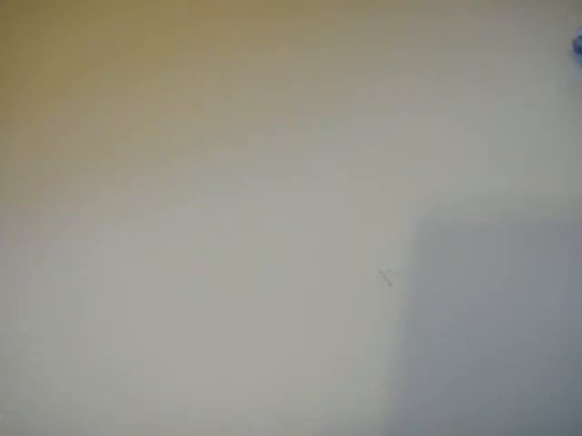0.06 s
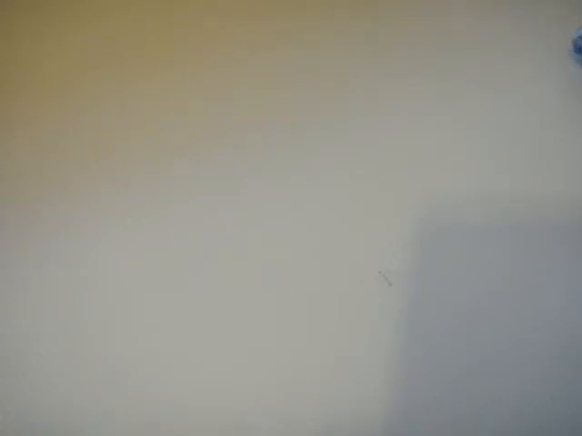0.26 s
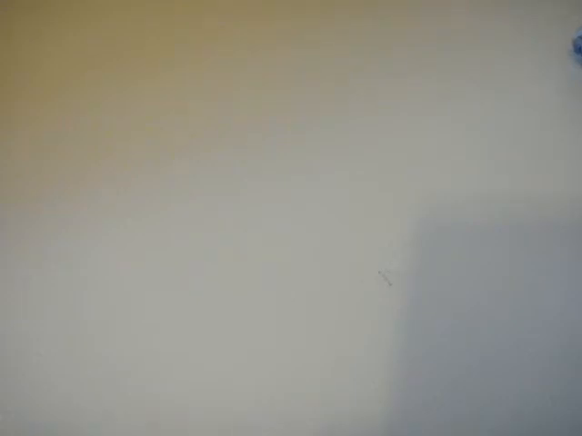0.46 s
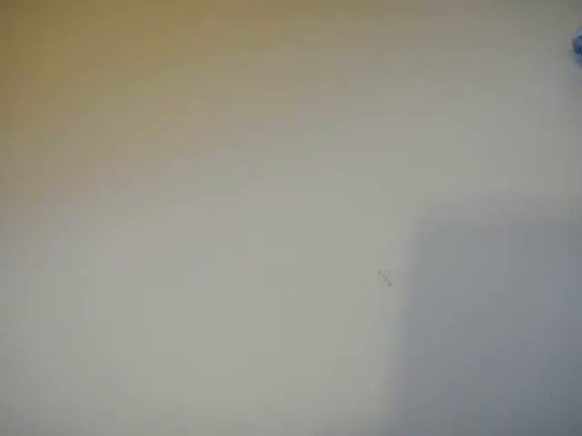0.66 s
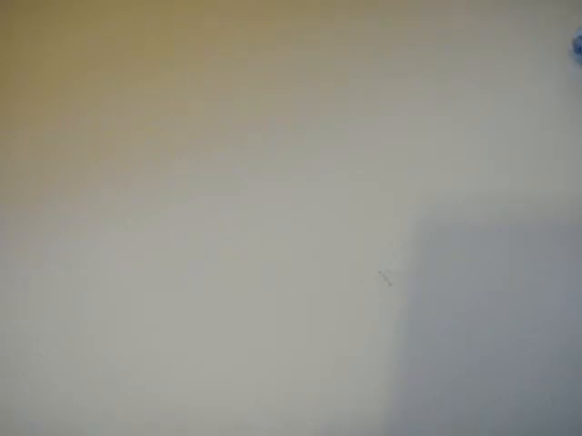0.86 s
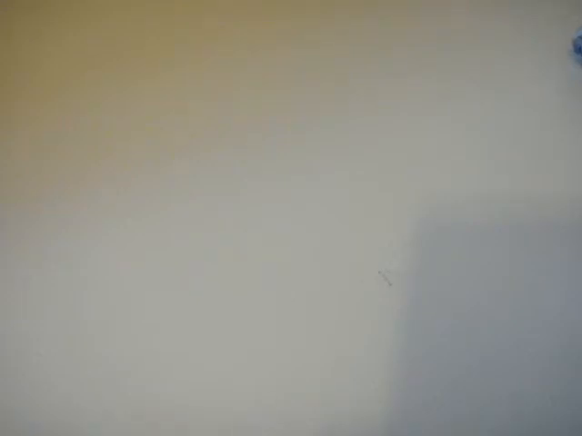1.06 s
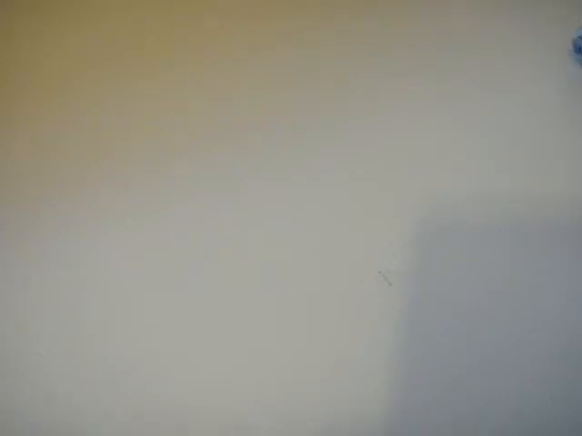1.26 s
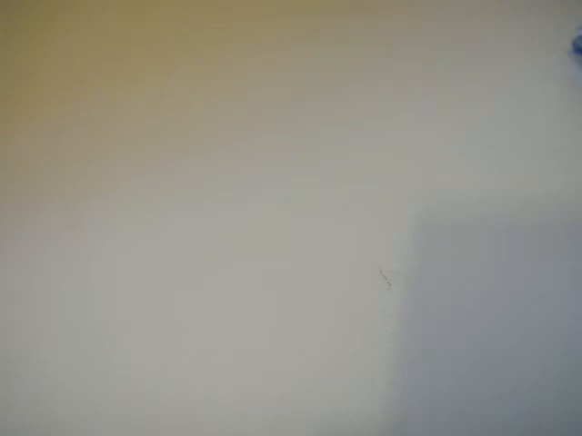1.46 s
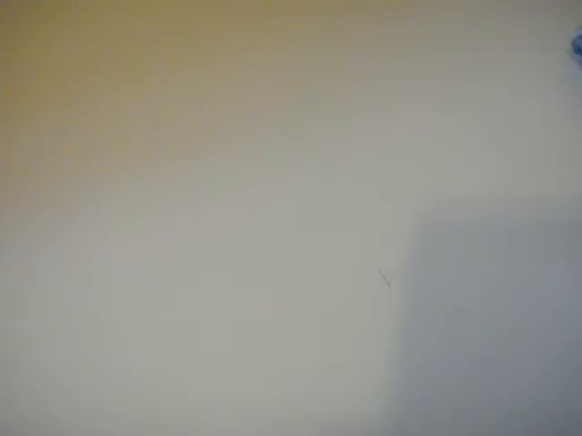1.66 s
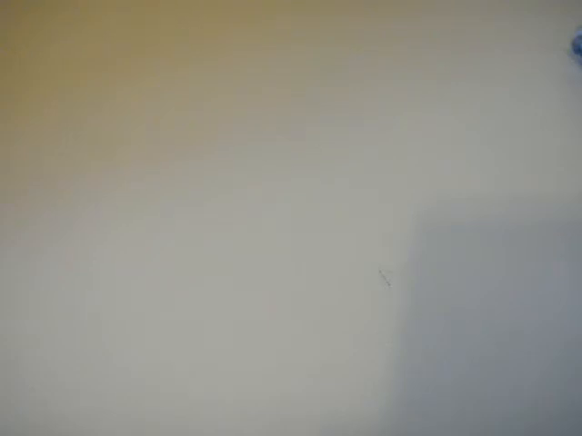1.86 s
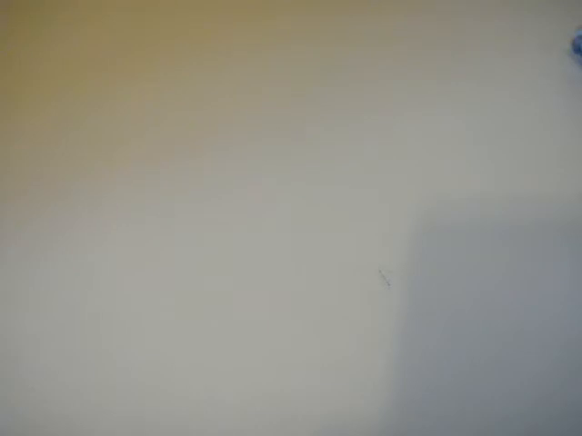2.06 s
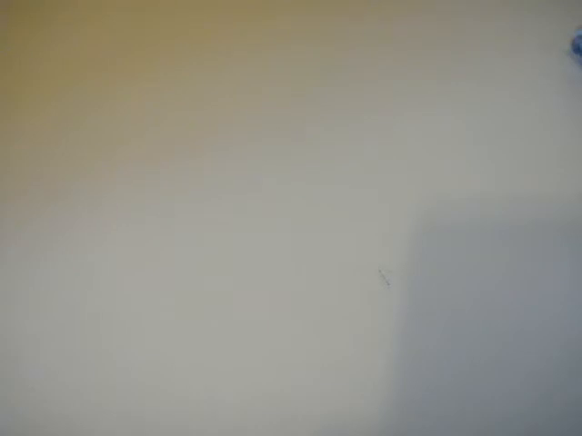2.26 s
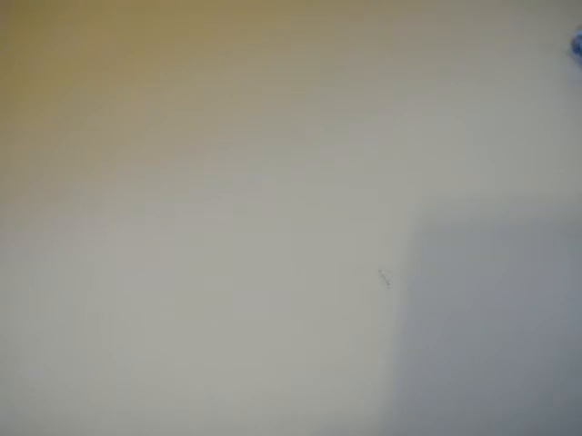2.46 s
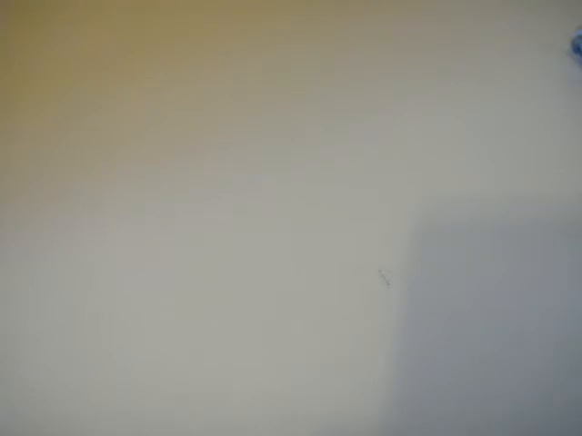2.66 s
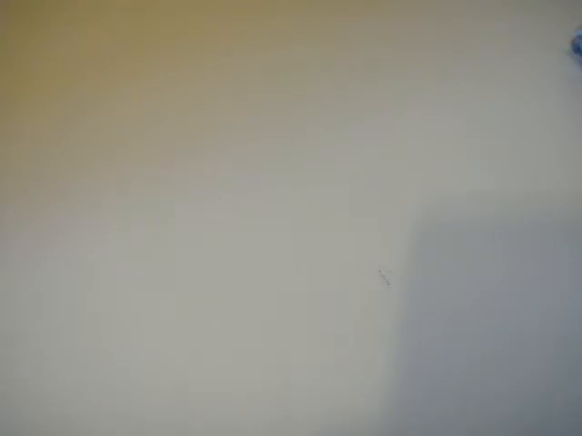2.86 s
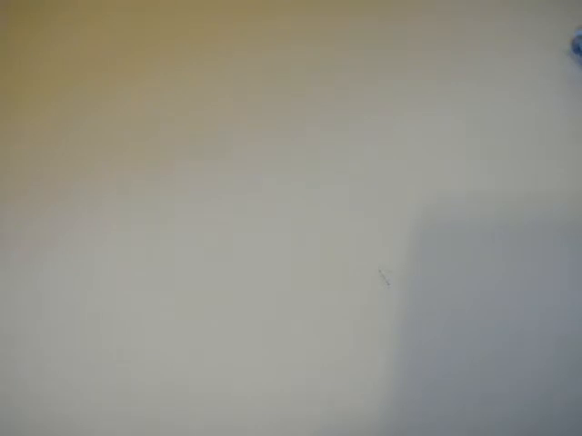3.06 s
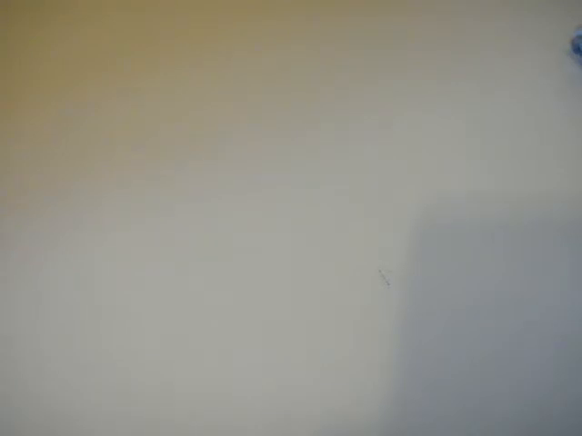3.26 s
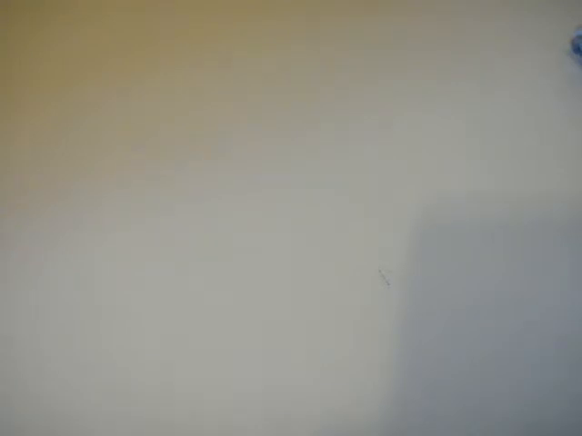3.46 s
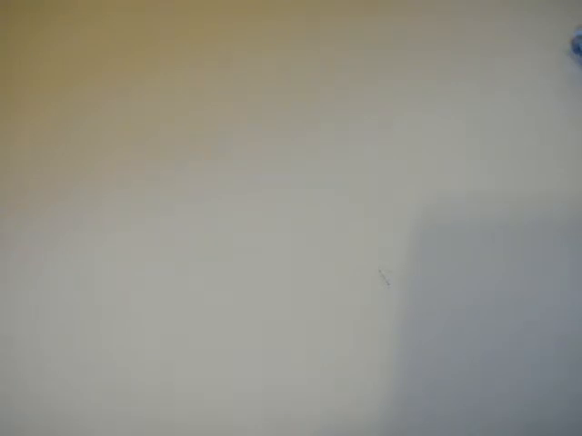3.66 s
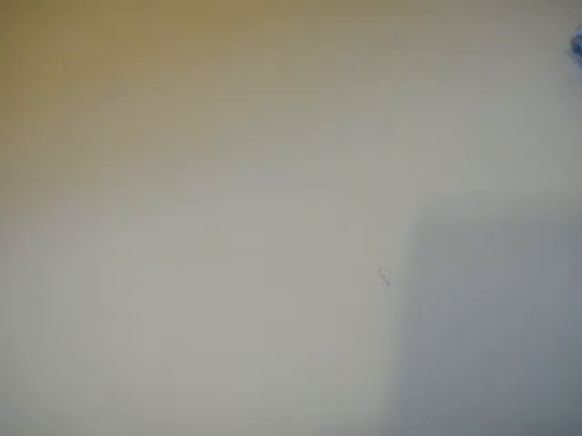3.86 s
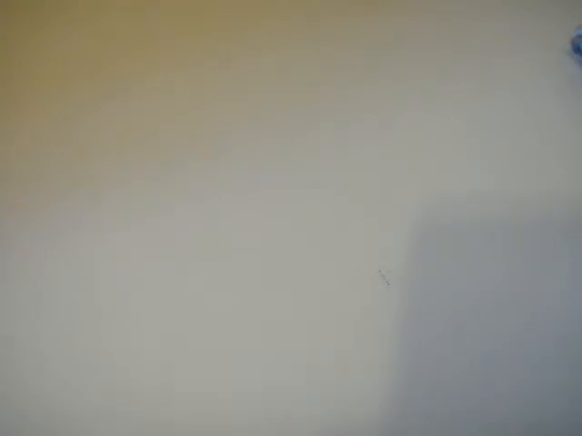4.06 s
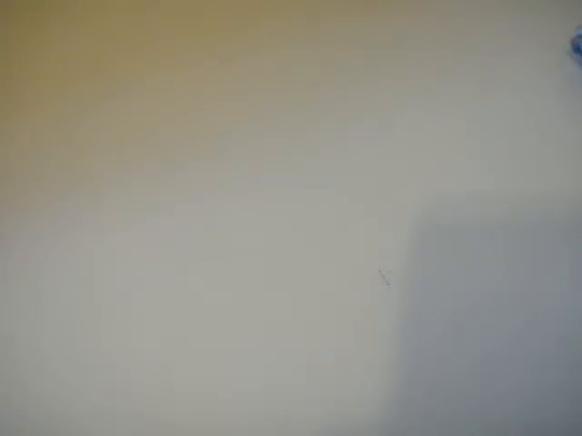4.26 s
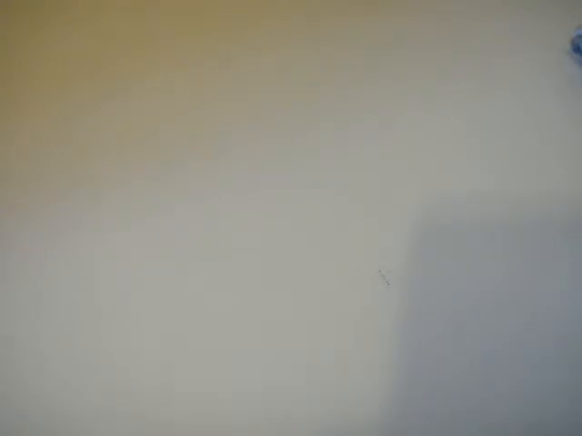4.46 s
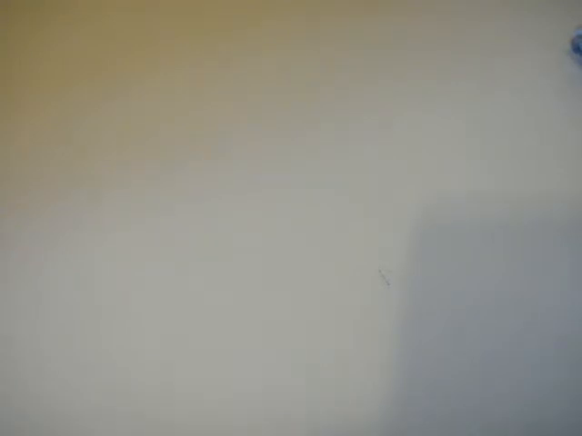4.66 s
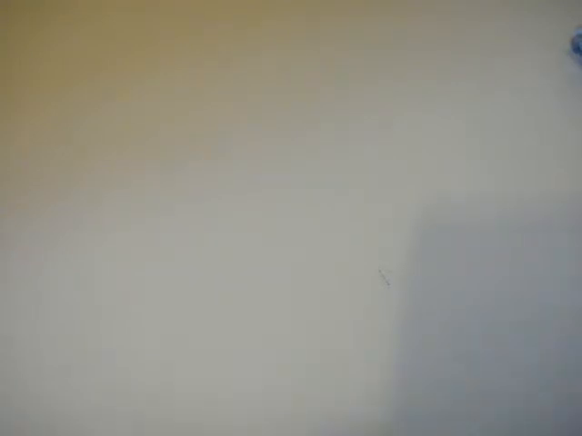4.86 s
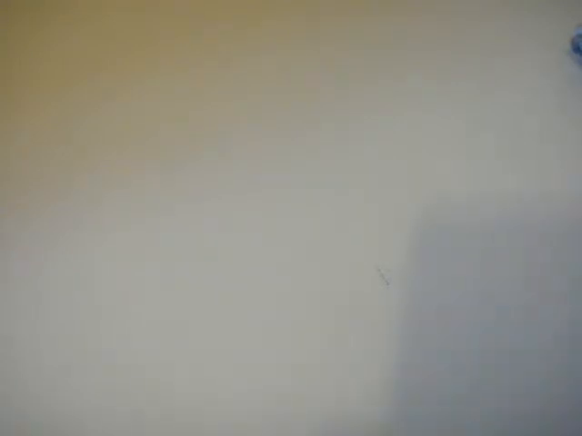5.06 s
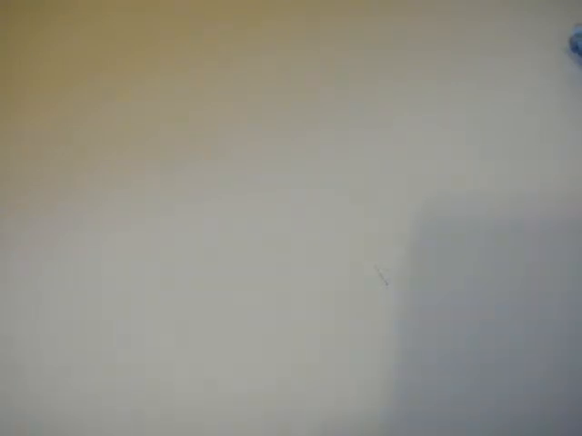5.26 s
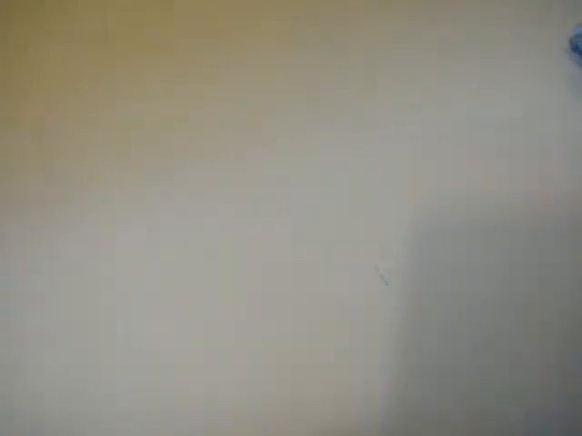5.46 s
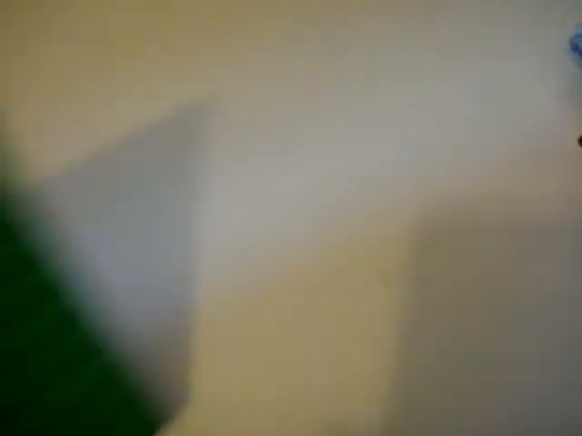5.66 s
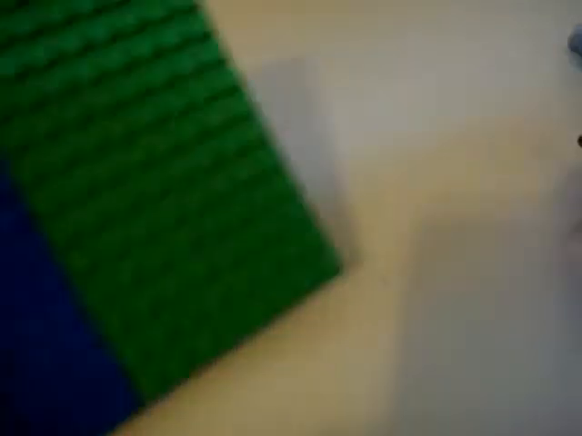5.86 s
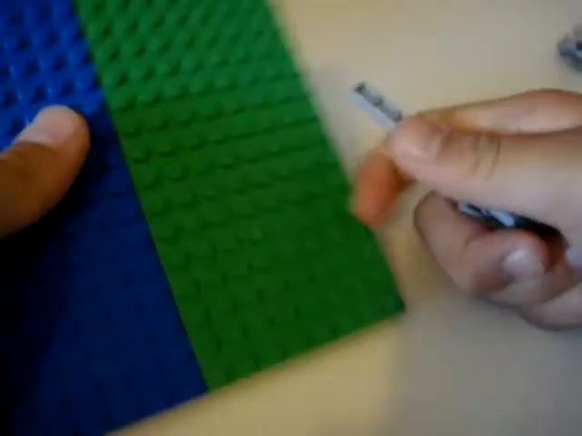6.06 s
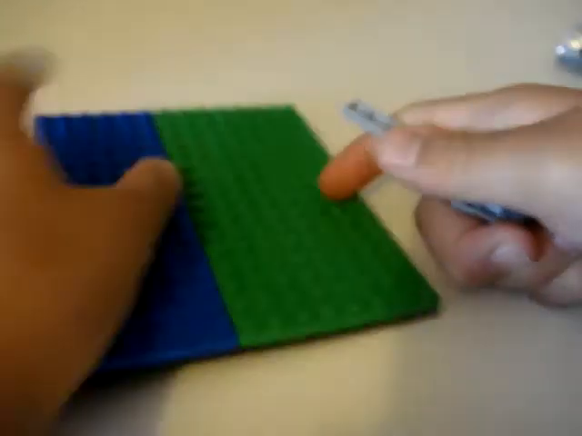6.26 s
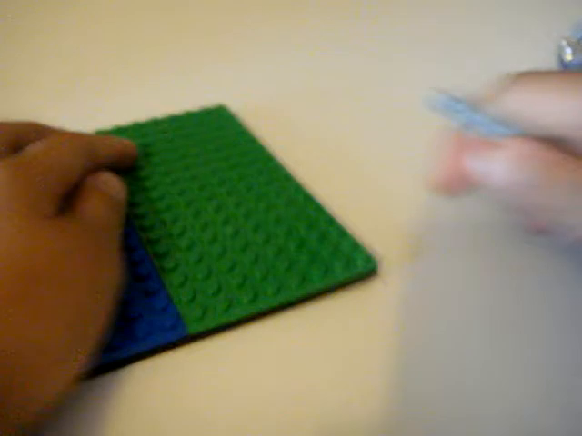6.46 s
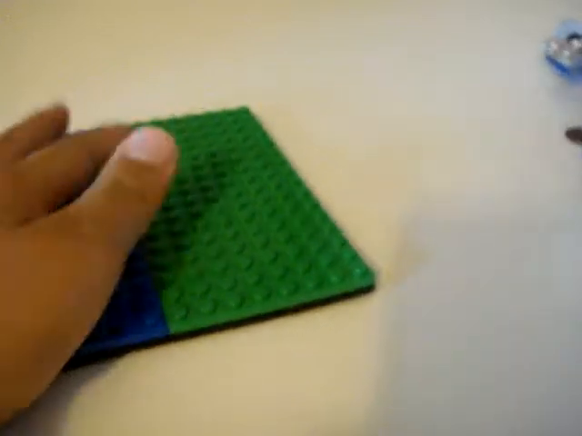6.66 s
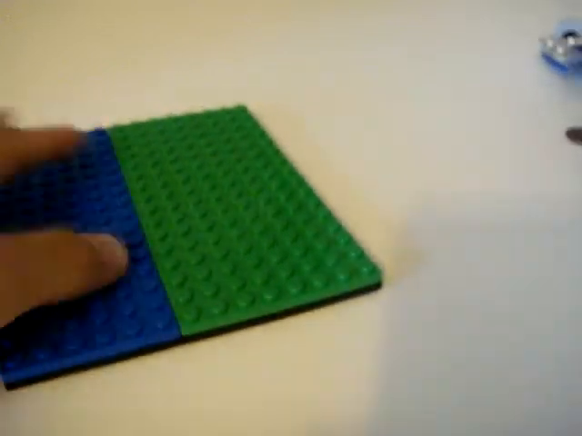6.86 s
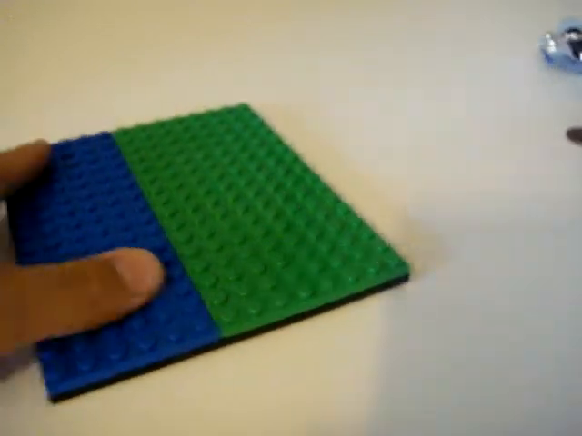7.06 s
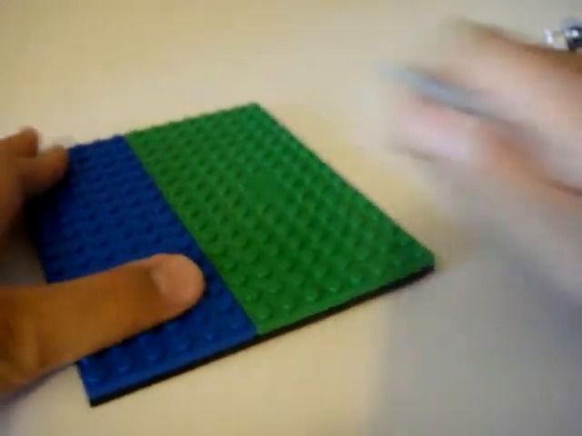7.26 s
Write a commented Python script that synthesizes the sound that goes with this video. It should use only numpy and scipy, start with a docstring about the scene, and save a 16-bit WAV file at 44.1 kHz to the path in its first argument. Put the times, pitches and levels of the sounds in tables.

```python
"""A dog barks at once in a quiet room's steady air; small plastic bricks click on a tabletop, a bird calls faintly.
A short scrape, a second bark and a brick snapping home follow: bursts of grains ring the modes of brick or table.
After thuds on the table, joined baseplates are dragged over, clatter, squeak and are pressed flat.
The barks are harmonics and breath through a throat; the close microphone overloads softly on the hardest blows."""
import sys
import numpy as np
from scipy import signal
from scipy.fft import rfft, irfft
from scipy.io import wavfile
from scipy.ndimage import uniform_filter1d

SR = 44100
rng = np.random.default_rng(int(sys.argv[2]) if len(sys.argv) > 2 else 0)


def store_pcm(level_fs):
    """Save levels as 16-bit WAV."""
    pcm = np.round(np.clip(level_fs, -1, 1) * 32767).astype(np.int16)
    wavfile.write(sys.argv[1], SR, np.atleast_2d(pcm).T)


N = 322371
TIME = np.arange(N) / SR  # s

# modes of a brick, the table and a plate: centre_hz (each ring detuned a little), energy_db, t60_s
BRICK_MODES = [(620, 13.5, 0.0085), (1430, 6, 0.0025), (2870, -15, 0.0028), (3470, 17, 0.0026),
               (4300, 10, 0.0076), (5700, -12, 0.0034), (8800, -22, 0.009)]
TABLE_MODES = [(333, -7.5, 0.078), (428.4, -0.5, 0.057), (514, -14, 0.027), (639, -1, 0.032),
               (860, 0.5, 0.022), (1050, -3, 0.028), (1326, 9, 0.01)]
PLATE_MODES = [(346, -1, 0.045), (427, -3, 0.075), (649, -6.5, 0.047), (860, -0.5, 0.084), (1014, 0, 0.022),
               (1126, 1.5, 0.032), (1311, 8, 0.029), (1454, 4.5, 0.082), (1575, 7, 0.032),
               (1753, 5.5, 0.018), (2337, -0.5, 0.03), (2510, -1, 0.0083), (2907, 8, 0.0082),
               (3460, 10.5, 0.012), (4700, -16, .015), (5000, -28, .015)]
# how hard the hands move the plates: time_s, effort_db
HAND_EFFORT = [(4.82, -51), (4.85, -14.5), (5.0, -30.5), (5.18, -20), (5.41, -1), (5.55, -9), (5.71, -64),
               (5.77, -6), (5.92, -12.5), (6.12, -16.5), (6.23, -7), (6.39, -18), (6.5, -3.5),
               (6.61, -17.5), (6.77, -6.5), (7.05, -14.5), (7.22, -25.5), (7.31, -8)]
# how well the plates pass their bass to the table, weak while they are lifted: time_s, contact_db
TABLE_CONTACT = [(5.24, 12.5), (5.3, -6.5), (5.6, -10.5), (5.75, -0.5), (5.89, -8.5), (6.07, 7.5),
                 (6.22, -0.5), (6.62, 6), (6.86, -4.5), (7.0, 1.5)]


def amp(db):
    """Decibels to gain."""
    return 10 ** (np.asarray(db) / 20)


def evened(x):
    """Scales to rms 1."""
    return x / np.sqrt(np.mean(x ** 2) + 1e-20)


def read(points, hz):
    """Interpolates a table on a log-frequency axis."""
    f, value = np.transpose(points)
    return np.interp(np.log(hz + 1), np.log(f + 1), value)


def follow(curve, s):
    """Reads a control curve at given times."""
    return np.interp(s, *np.transpose(curve))


def add(mix, s, sound):
    """Mixes a sound in at a time."""
    part = mix[max(round(s * SR), 0):][:len(sound)]
    part += sound[:len(part)]


def band(x, lo_hz, hi_hz, order=3):
    """Causal band-pass."""
    edges_hz = [lo_hz, min(hi_hz, SR / 2.1)]
    return signal.sosfilt(signal.butter(order, edges_hz, "band", fs=SR, output="sos"), x)


def coloured(x, spectrum):
    """Gives a whole track a spectrum, at rms 1."""
    gain = amp(read(spectrum, np.fft.rfftfreq(N, 1 / SR)))
    return evened(irfft(rfft(x) * gain, N))


def body(modes, crack_db, detune=.004):
    """Impulse response of a thing: a bare crack plus decaying modes, each with the energy of its dB."""
    t = TIME[:SR // 3]
    ring = np.zeros(len(t))
    for hz, db, t60_s in modes:
        tone = np.sin(2 * np.pi * hz * rng.normal(1, detune) * t) * rng.choice([-1, 1])
        ring += amp(db - 60 * t / t60_s) * tone / np.sqrt(t60_s)
    ring = ring / np.linalg.norm(ring)
    ring[0] += amp(crack_db)
    return ring


def room(x, stretch):
    """Diffuse reflections that build up quickly and decay at a rate set per frequency."""
    # centre_hz, t60_s (before stretch)
    decay_points = [(130, 0.98), (300, 0.098), (700, 0.33), (2000, 0.2), (5000, 0.089), (10000, 0.091)]
    hz, t, z = signal.stft(rng.standard_normal(SR), SR, nperseg=256)
    decay = amp(-60 * t / (stretch * read(decay_points, hz)[:, None]))
    tail = signal.istft(z * decay, SR, nperseg=256)[1][:SR]
    tail = tail * np.clip((TIME[:SR] - .004) / 0.0096, 0, 1)
    return signal.fftconvolve(x, tail / np.linalg.norm(tail))[:N]


def grains(count, per_s, spread_db):
    """Tiny slips of uneven size at random moments, at rms 1."""
    sizes = amp(spread_db * np.minimum(rng.exponential(1, count), 3)) * rng.standard_normal(count)
    return evened(sizes * (rng.random(count) < per_s / SR))


def blows(rows, modes, colour_db, rise_s, crack_db, first_db, scatter_db, thump_db, echo_db, echo_t60_s,
          lifted=False):
    """First contact and chatter ring a body; hardness brightens, and lifting weakens the bass."""
    # low, mid, high, top registers: from_hz, to_hz
    registers = [(230, 800), (800, 2500), (2500, 5000), (5000, 11000)]
    # per register: level_db per dB of hardness
    hardness_slopes = [-0.19, -0.035, 0.69, 1.3]
    bass_modes_hz = 1230  # modes below this need the table under them
    out, t = np.zeros(N), TIME[:SR // 3]
    u = t / 0.0017
    thump = (1 - u) * np.exp(-u) * (1 - np.exp(-4 * u))  # a low thump with each blow
    for s, strength_db, hardness_db, t60_s in rows:
        levels_db = strength_db + np.array(colour_db) + hardness_db * np.array(hardness_slopes)
        bass_db = follow(TABLE_CONTACT, s) if lifted else 0
        levels_db[0] += bass_db

        swell = 1 - np.exp(-t / max(rise_s, .0001))
        contact = grains(len(t), 9000, 1.9) * amp(-60 * t / max(t60_s, .004)) * swell
        contact = contact / np.linalg.norm(contact)
        contact[0] += amp(first_db)

        # each blow has its own diffuse echo
        echo = rng.standard_normal(len(t)) * amp(-60 * t / echo_t60_s) * (1 - np.exp(-t / 0.022))
        contact = contact + amp(echo_db) * echo / np.linalg.norm(echo)

        struck = [(hz, db + bass_db * (hz < bass_modes_hz) + scatter_db * rng.standard_normal(), ring_s)
                  for hz, db, ring_s in modes]
        sound = signal.fftconvolve(contact, body(struck, crack_db))[:len(t)]
        for (lo_hz, hi_hz), db in zip(registers, levels_db):
            part = band(sound, lo_hz, hi_hz)
            add(out, s, amp(db) * part / np.std(part[:SR // 64]))  # levelled on its first 1/64 s
        add(out, s, amp(max(levels_db[0], levels_db[-1]) + thump_db) * thump)
    return out


def room_air(level_db=-51.5):
    """The room's steady air: noise with a fixed spectrum."""
    # centre_hz, level_db (relative)
    air_points = [(25, -29), (75, -15.5), (110, -8.5), (250, -5), (430, -2), (680, -4), (820, 1),
                  (1000, -5.5), (1400, -9.5), (2500, -12.5), (4000, -16.5), (10000, -23), (13000, -93)]
    return amp(level_db) * coloured(rng.standard_normal(N), air_points)


def dog(rough=0.47, wet_db=-5.5):
    """Rough, falling barks through throat resonances, dulled and smeared by the rooms between."""
    # start_s, length_s, level_db (before the output gain), mouth_db (opening: gain of the upper throat)
    bark_rows = [(0.0, .12, -25.5, -11.5), (3.675, .17, -24.5, 1.5)]
    # resonances, lowest first: centre_hz, width_hz, gain_db
    throat_rows = [(458, 200, -2), (835, 44, -7.5), (997, 7, 9.5), (1460, 400, -9.5)]
    top_hz, end_hz, fall_share = 587, 378.2, .4  # pitch holds, then drops around this share of the length
    rise_share, fade_db = 0.13, -14.5  # share of the length spent rising; level change by the end
    out = np.zeros(N)
    for s, length_s, db, mouth_db in bark_rows:
        u = np.linspace(0, 1, int(length_s * SR))
        hz = end_hz + (top_hz - end_hz) / (1 + (u / fall_share) ** 5)
        jitter = evened(uniform_filter1d(rng.standard_normal(SR), 90))[:len(u)]
        turns = np.cumsum(hz * (1 + 0.045 * jitter)) / SR
        folds = evened(sum(np.cos(2 * np.pi * k * turns) for k in range(1, 6)))
        breath = rng.standard_normal(SR)[:len(u)] * np.exp(-2 * (turns % 1))  # one puff per cycle
        puffs = evened(band(breath, 448, 1420))
        drive = (1 - rough) * folds + rough * puffs
        low, *upper = [amp(gain_db) * signal.lfilter(*signal.iirpeak(f_hz, f_hz / width_hz, SR), drive)
                       for f_hz, width_hz, gain_db in throat_rows]
        voice = low + amp(mouth_db) * sum(upper)
        envelope = np.minimum(u / rise_share, 1) * amp(db + fade_db * u ** 2)
        add(out, s, envelope * evened(band(voice, 286, 1590)))
    return amp(-3.5) * (out + amp(wet_db) * room(out, 3.2))


def brick_clicks():
    """Small bricks touching: short chatter rings the brick's modes."""
    # start_s, strength_db, hardness_db, chatter_t60_s
    click_rows = [(0.166, -42, 4, 0.048), (0.416, -35.5, 1, .048), (0.554, -27, -7, 0.074),
                  (0.64, -34, -2.5, 0.12), (0.707, -37.5, 2, 0.044), (0.752, -47.5, 3, .027),
                  (0.821, -38.5, 1, .042), (1.771, -23.5, -8, 0.071), (1.938, -41.5, 1, 0.099),
                  (2.642, -23, -10.5, 0.12), (2.875, -44, 2, .035), (3.826, -34, -10, 0.2),
                  (4.003, -24, 4, .13), (4.272, -41.5, 7, 0.011), (4.586, -46.5, -1.5, 0.026),
                  (5.678, -44.5, 8, 0.018), (6.007, -29.5, 2.5, 0.012)]
    return blows(click_rows, BRICK_MODES, colour_db=[-15, -11.5, -6.5, -8.5], rise_s=0.0005, crack_db=6.5,
                 first_db=-6.0, scatter_db=0.5, thump_db=-0.5, echo_db=-13.5, echo_t60_s=0.39)


def bird(arch_hz=170, waver_hz=80):
    """Short whistles whose pitch and level arch, with a random waver and room reflections."""
    # start_s, length_s, pitch_hz (at the top of the arch), level_db (before the output gains)
    whistle_rows = [(1.433, 0.083, 2510, -62.5), (1.923, 0.12, 3080, -62), (2.047, 0.098, 2495, -61.5),
                    (2.443, 0.074, 2500, -56.5), (2.515, 0.15, 3000, -61.5), (2.932, 0.057, 2500, -55.5),
                    (2.984, 0.17, 3040, -60.5)]
    out = np.zeros(N)
    for s, length_s, hz, db in whistle_rows:
        arch = np.sin(np.pi * np.linspace(0, 1, int(length_s * SR)))
        waver = evened(uniform_filter1d(rng.standard_normal(len(arch)), 150))
        pitch_hz = hz + arch_hz * (arch - 1) + waver_hz * waver
        add(out, s, amp(db) * arch * np.sin(2 * np.pi * np.cumsum(pitch_hz) / SR))
    return amp(3.5) * out + amp(1.5) * room(out, 2.5)


def scrape(start_s=3.586, rise_s=0.0027, hold_s=0.0057, fall_db_per_s=185, peak_db=-22):
    """A brick flicked over the table: a burst of bright, fine slips that dies away fast."""
    # centre_hz, level_db (relative)
    scrape_points = [(15, -20), (25, -10), (75, -42), (221, -18.5), (284, -22.5), (519, -4), (775, -8),
                     (1050, -10), (1420, -10.5), (2720, -6), (3080, -9.5), (4480, -5.5), (10000, -9),
                     (13000, -50), (22000, -120)]
    slips = grains(N, 8000, 3)
    t = TIME - start_s
    fall = amp(peak_db - fall_db_per_s * np.maximum(t - hold_s, 0))  # hold_s counts from the start
    return np.clip(t / rise_s, 0, 1) * fall * coloured(slips, scrape_points)


def boom(x):
    """The table's lowest modes hum on after what drives them."""
    t = TIME[:SR]
    low_modes = [(73, -66.5, 0.18), (135.7, -50.5, 0.87), (197.2, -60.5, 0.38)]  # centre_hz, level_db, t60_s
    ring = sum(amp(db - 60 * t / t60_s) * np.sin(2 * np.pi * hz * t) for hz, db, t60_s in low_modes)
    return signal.fftconvolve(x, ring)[:N]


def brick_snap():
    """A brick snapping home on its studs: one blow on the brick's modes."""
    # start_s, strength_db, hardness_db, chatter_t60_s
    snap_rows = [(4.298, -26, 1.5, 0.047)]
    return blows(snap_rows, BRICK_MODES, colour_db=[-29, -18.5, -1, -16], rise_s=0.00061, crack_db=8,
                 first_db=-7, scatter_db=3.5, thump_db=-3, echo_db=-12, echo_t60_s=0.23)


def slide(rumble_db=-29, rasp_db=-28.5, hiss_db=-35, hiss_slope=0.58):
    """Slips under the moving plates shake table and plastic, with a fine hiss; all follow the effort."""
    effort_db, moving = follow(HAND_EFFORT, TIME), TIME > HAND_EFFORT[0][0]
    slips = grains(N, 900, 3.5)
    rumble = evened(band(signal.fftconvolve(slips, body(TABLE_MODES, 12.4))[:N], 161, 714))
    rasp = evened(band(signal.fftconvolve(slips, body(PLATE_MODES, 11.0))[:N], 890, 2180, order=2))
    fine_slips = grains(N, 6000, 3.5)
    hiss_points = [(300, -42), (2000, 9.0), (4000, 2), (6500, 0.5), (10000, -6.5), (13000, -66)]
    hiss = coloured(fine_slips, hiss_points)
    rumble = amp(rumble_db + effort_db + follow(TABLE_CONTACT, TIME)) * rumble
    rasp = amp(rasp_db + effort_db) * rasp
    hiss = amp(hiss_db + hiss_slope * effort_db) * hiss
    return moving * (rumble + rasp + hiss)


def table_thuds():
    """Dull blows on the table: slower-swelling chatter rings its modes."""
    # start_s, strength_db, hardness_db, chatter_t60_s
    thud_rows = [(4.826, -11, -2, 0.089), (4.875, -18, 3.5, 0.025), (5.014, -23.5, -3, 0.068),
                 (5.052, -23, -3.5, 0.034), (5.098, -33, 5, .06), (5.199, -17.5, 2.5, 0.063),
                 (5.234, -31, 1, 0.089), (6.598, -16.5, -2, 0.025)]
    return blows(thud_rows, TABLE_MODES, colour_db=[-7, -14, -22, -24.5], rise_s=0.0044, crack_db=3.5,
                 first_db=-15.0, scatter_db=1.5, thump_db=-15, echo_db=-6.5, echo_t60_s=0.19)


def plate_knocks():
    """Baseplates knocking and rattling: their bass varies with contact to the table."""
    # start_s, strength_db, hardness_db, chatter_t60_s
    knock_rows = [(5.295, -6.5, 6.5, 0.067), (5.372, -8.5, 9, .058), (5.394, -8.5, -2, .05),
                  (5.406, -8, 3.5, .08), (5.436, -11, 3.5, 0.1), (5.486, -17, -0.5, 0.099),
                  (5.554, -11.5, 0.5, 0.065), (5.633, -26, 1, .036), (5.733, -2, -1, 0.051),
                  (5.744, -5.5, -6, 0.12), (5.82, -24.5, 7, 0.016), (5.892, -18.5, 1.5, 0.03),
                  (5.979, -18.5, 5.5, 0.05), (6.018, -22, -14, 0.025), (6.061, -8.5, 1, .077),
                  (6.095, -16, -1, 0.062), (6.238, -8, 4.5, 0.093), (6.256, -15.5, -5, 0.033),
                  (6.406, -26, 12.5, 0.032), (6.43, -15.5, 11, .04), (6.466, -9.5, 9, 0.055),
                  (6.479, -9, 9, 0.076), (6.656, -17, -1, 0.1), (6.685, -12.5, 2.5, 0.23),
                  (6.724, -13.5, 4.5, 0.056), (6.747, -5, 1, .05), (6.762, -9.5, 3, 0.26),
                  (6.82, -12, -2, 0.12), (6.83, -9.5, 4, 0.027), (6.855, -11, -9, 0.027),
                  (6.875, -18, -4, 0.046), (6.931, -24, -28, 0.075), (7.039, -17, -6, 0.089),
                  (7.101, -25, -9, 0.14), (7.176, -22.5, 4.5, 0.063)]
    return blows(knock_rows + rattles(count=26), PLATE_MODES, colour_db=[-16.0, -7.0, -15.0, -28.5],
                 rise_s=.0016, crack_db=6.5, first_db=-6.5, scatter_db=3.5, thump_db=2, echo_db=-9.5,
                 echo_t60_s=0.24, lifted=True)


def rattles(count, strength_db=-21, spread_db=3, hardness_db=4, t60_s=0.02):
    """Rows of light knocks, one at a random moment of each equal slot, as strong as the hands' effort."""
    # from_s, to_s
    span_s = (5.3, 7.1)
    chance = rng.random((count, 3))
    times_s = span_s[0] + (span_s[1] - span_s[0]) * (np.arange(count) + chance[:, 0]) / count
    return [(s, strength_db + follow(HAND_EFFORT, s) + spread_db * size, hardness_db + spread_db * edge, t60_s)
            for s, (size, edge) in zip(times_s, 2 * chance[:, 1:] - 1)]


def squeak(centre_hz=2350, width_hz=650):
    """A plate's edge on the table: quick stick and slip in one broad resonance, swelling and fading."""
    # start_s, length_s, level_db
    squeak_rows = [(6.166, .125, -34), (6.402, 0.025, -22.5)]
    slips, swell = grains(N, 2500, 2), np.zeros(N)
    for s, length_s, db in squeak_rows:
        add(swell, s, amp(db) * np.sqrt(np.hanning(int(length_s * SR))))
    return swell * evened(band(slips, centre_hz - width_hz / 2, centre_hz + width_hz / 2, order=2))


def scene():
    """Plastic on the table, the room around it, and the dog and bird beyond."""
    clicks, snap = brick_clicks(), brick_snap()
    thuds, knocks = table_thuds(), plate_knocks()
    rubbing = scrape() + slide() + squeak()
    plastic = clicks + snap + thuds + knocks + rubbing
    reflections = amp(-9.0) * room(rubbing, 0.78)  # the blows carry their own echoes
    hum = boom(amp(10) * thuds + amp(2.5) * (knocks + rubbing))
    return (plastic + reflections + hum + dog() + bird() + room_air())[None]


def record(dry, lopsided=3.4, ceiling=.56, edge_hz=10250):
    """Soft overload, slightly lopsided so that sharp treble leaves a low bump; then the band limit."""
    bump = band(band(dry, 4000, 11000) ** 2, 49, 220, order=2)
    squashed = ceiling * np.tanh((dry + lopsided * bump) / ceiling)
    low_pass = signal.firwin(511, edge_hz, window=("kaiser", 8), fs=SR)
    return signal.oaconvolve(squashed, low_pass[None], "same")


dry = scene()
out = record(dry)
store_pcm(out)
```